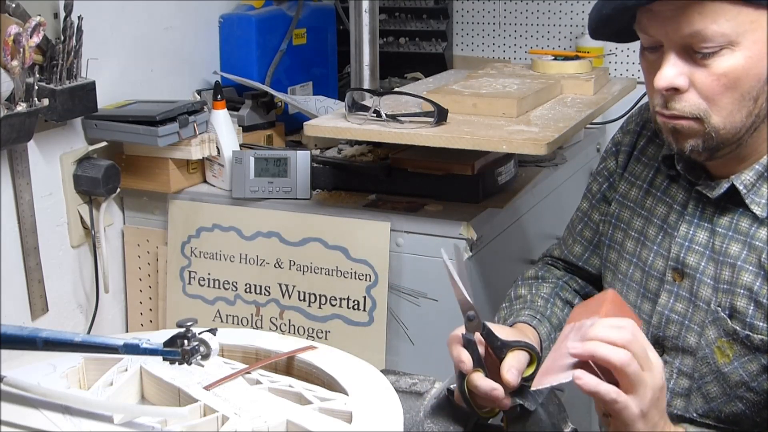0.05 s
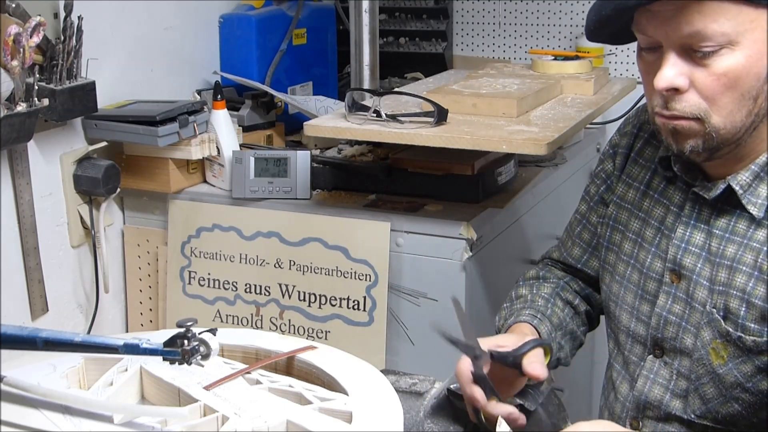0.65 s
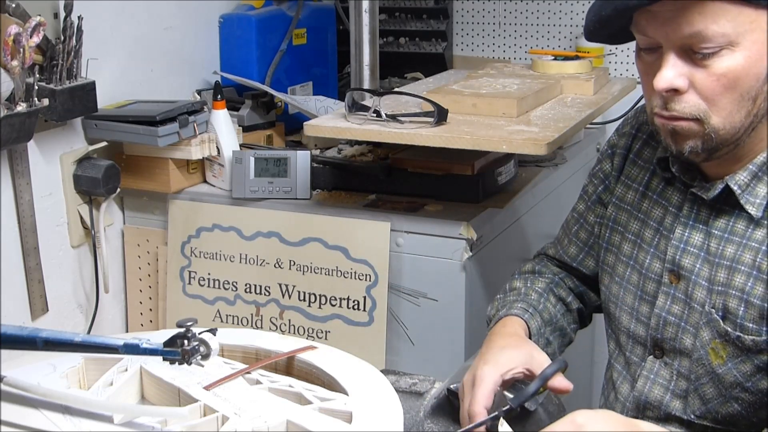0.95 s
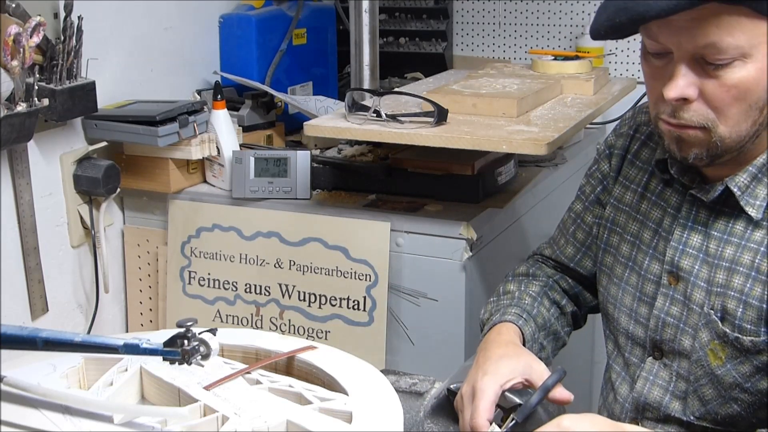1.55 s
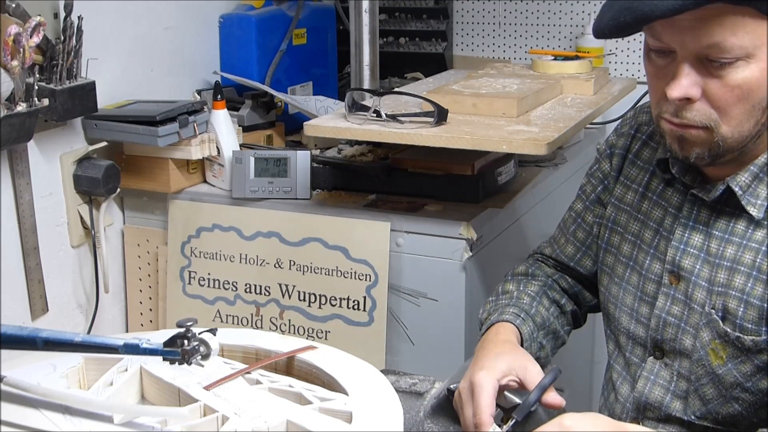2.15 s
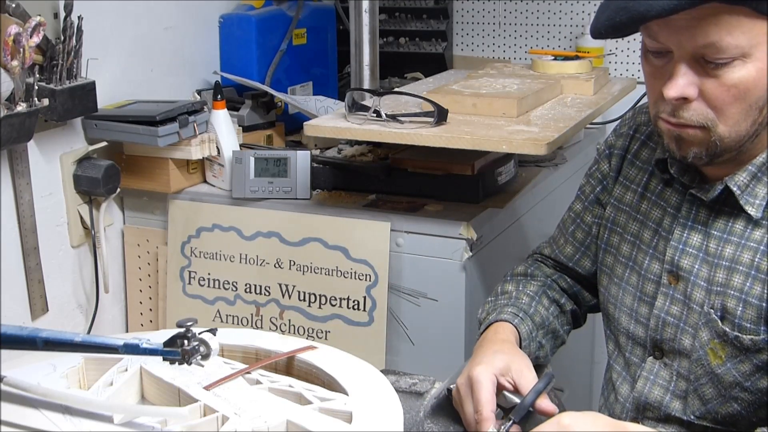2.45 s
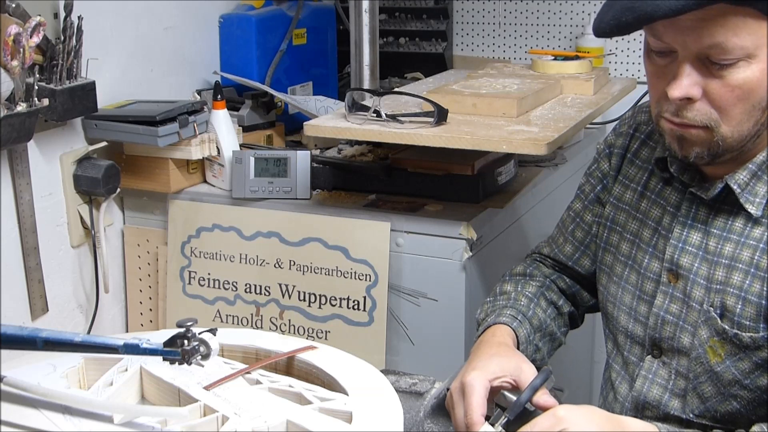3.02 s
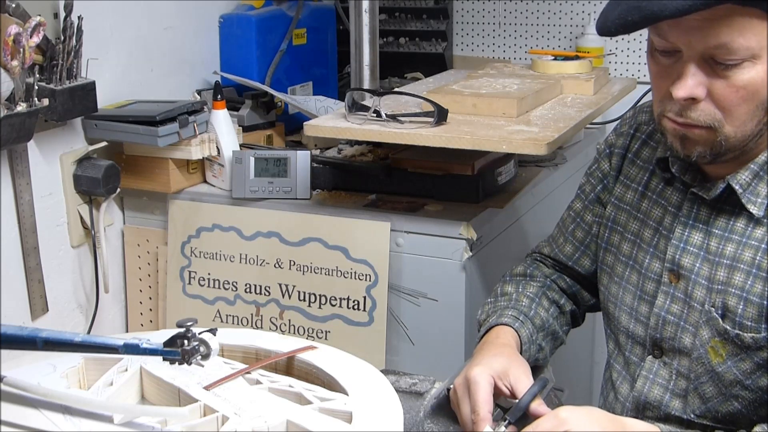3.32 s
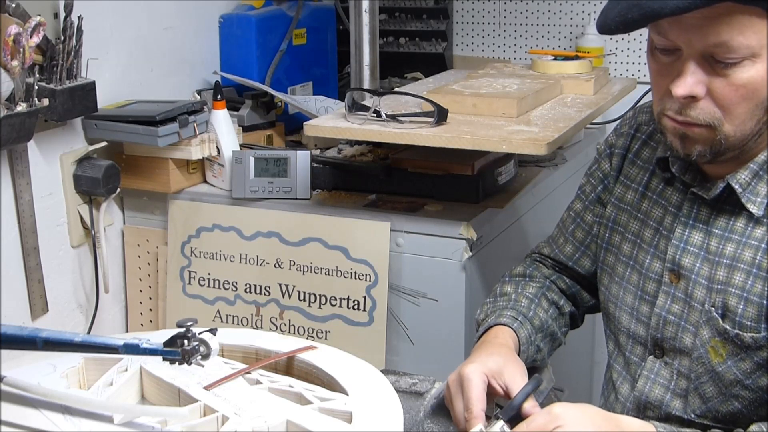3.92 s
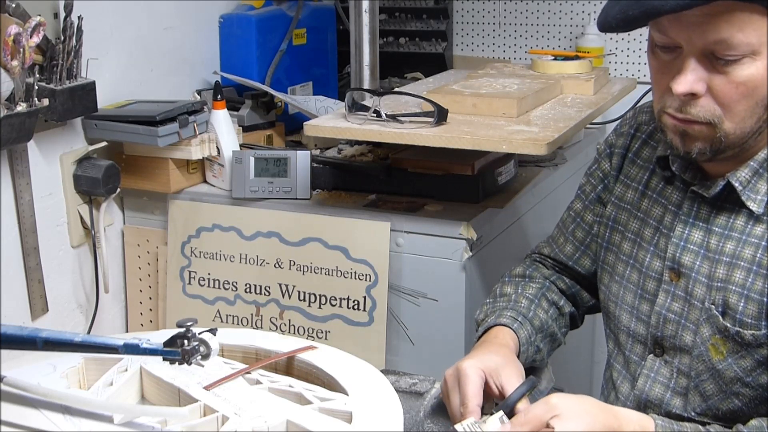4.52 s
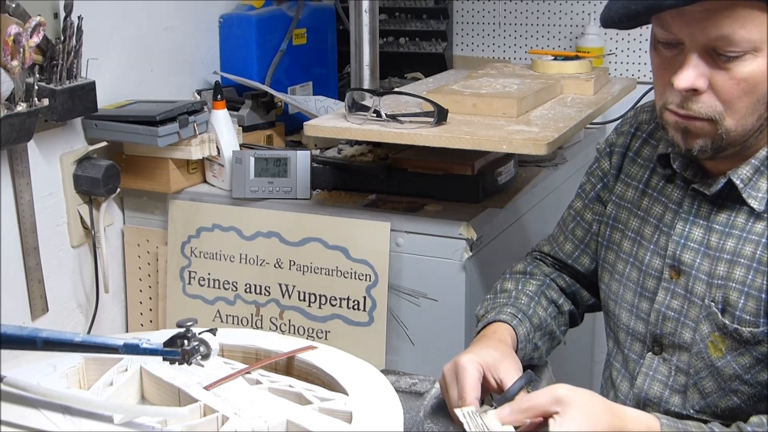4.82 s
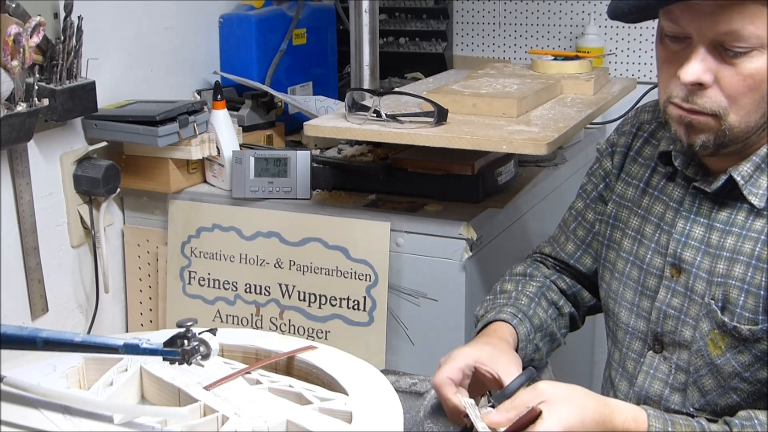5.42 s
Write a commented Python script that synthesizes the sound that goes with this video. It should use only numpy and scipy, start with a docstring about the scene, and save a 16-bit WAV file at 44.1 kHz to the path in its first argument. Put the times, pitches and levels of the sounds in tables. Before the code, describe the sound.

Sandpaper rasps and snaps as it is handled, then scissors cut it in gritty, ticking strokes over a faint hiss.

```python
"""Scissors cut a strip of sandpaper at a workbench in a small, cluttered workshop.
The blades crunch through thousands of tiny grains, sticking and slipping with sharp ticks.
The sheet rasps when rubbed, a loose flap hums, and the stiff backing snaps as it bends.
A hand and a sanding block nudge the bench. Much of the sound arrives as short room echoes,
over a steady hiss and a faint hum."""
import sys
import numpy as np
from scipy import signal
from scipy.fft import rfft, irfft, next_fast_len
from scipy.io import wavfile
from scipy.ndimage import uniform_filter1d

SR = 44100
rng = np.random.default_rng(int(sys.argv[2]) if len(sys.argv) > 2 else 0)


def to_wav(sig):
    """Store sig (one row per channel, or 1-D mono) as 16-bit WAV at the path in sys.argv[1].

    Samples outside -1..1 are clipped; the rate is SR.
    """
    pcm = np.clip(np.atleast_2d(sig), -1, 1) * 32767
    pcm = np.round(pcm).astype(np.int16)
    wavfile.write(sys.argv[1], SR, pcm.T)  # frames by channels


N = 245839
TIME = np.arange(N) / SR
FFT_SIZE = next_fast_len(N + SR // 2, real=True)
HZ = np.maximum(np.arange(FFT_SIZE // 2 + 1) * SR / FFT_SIZE, 1)

# Tone of the hiss from still air and the microphone: frequency_hz, gain_db
HISS_TONE = [(20, 1), (45, -5), (100, -7.5), (200, -3), (350, -5.5), (480, -6.5), (700, -6), (1000, -6.5),
             (1600, -11), (3200, -15), (5000, -13.5), (8500, -15), (12000, -16.5), (15500, -24)]
# How much the hiss differs between the ears: frequency_hz, side_db
HISS_STEREO = [(30, -13), (120, -9), (300, 2), (600, 8), (1200, -0.5), (3000, -2.5), (6000, -5.5),
               (9000, -13), (15000, -18)]
# Faint hum of the room: pitch_hz, width_hz, level_db
ROOM_HUM = [(140, 5.2, -82), (170, 9.9, -87.5), (643, 45, -82)]
# A hand or blade rubs the sheet: start_s, peak_s, end_s, level_db, low_db, high_db
RUBS = [(0, 0.006, 0.074, -46, 9.5, -4), (0.11, 0.192, 0.21, -61, 8, 2),
        (0.207, 0.259, 0.26, -49.5, 12, -1.5), (0.687, 0.813, 0.84, -55.5, 6, 1),
        (0.854, 0.886, 0.92, -46, 4, -6.5), (0.948, 1.05, 1.07, -56.5, -5, -3),
        (1.499, 1.529, 1.541, -41.5, 1.5, -7.5), (1.793, 1.833, 1.93, -63.5, 10, -2),
        (3.792, 3.805, 3.816, -25.5, -11, -8), (3.81, 3.818, 3.85, -40, 3.5, 0),
        (3.947, 3.944, 4.13, -62, -5, 11), (4.503, 4.511, 4.57, -57.5, -8, 7),
        (4.686, 5.0, 5.33, -58, 2.5, -4.5), (4.836, 4.865, 4.86, -46, 5, -5),
        (4.914, 4.915, 4.975, -50, -3, 2), (5.238, 5.24, 5.3, -46, 5, -15),
        (5.329, 5.359, 5.385, -40.5, 6, -6), (5.48, 5.533, 5.56, -47.5, 0.5, 1.5)]
# Tone of grit breaking on the paper backing: frequency_hz, gain_db
PAPER_TONE = [(150, -20.5), (400, -22.5), (560, -10.5), (770, -14), (980, -5.5), (1500, -5.5), (2000, -3.5),
              (3100, -6.5), (4300, -9.5), (4900, 0), (7500, 2), (10000, -2.5), (12200, -7), (16000, -25)]
# Pitches at which the sheet and blades ring: pitch_hz, width_hz, gain_db
SHEET_RESONANCES = [(840, 100, 5), (1433, 29, 8.5), (2323, 340, 9), (2600, 84, 3.5), (3973, 600, 8.5),
                    (4640, 210, 5), (4900, 74, -1), (8760, 470, 1.5)]
# The hand and block nudge the bench: start_s, level_db, pitch_hz
NUDGES = [(0.028, -53, 575), (0.034, -60, 182), (1.113, -62, 420), (4.745, -68, 298), (5.118, -67, 260),
          (5.278, -60, 308), (5.358, -67, 160)]
# The sheet buckles or the blades snap through:
# start_s, level_db, length_s, list of resonances (pitch_hz, width_hz, gain_db)
SNAPS = [(0.0285, -33.5, 0.0064, [(557, 144, -2), (1470, 730, 1.5), (2760, 300, -3.5), (3670, 1050, -2),
         (6460, 980, -7), (9300, 580, -3)]), (1.1117, -29, 0.0029, [(913, 300, 6), (1470, 550, 6),
         (2510, 540, 0.5), (3900, 1500, 1.5), (4840, 1000, 4.5), (8700, 1300, -2), (10900, 2100, -4.5)]),
         (2.437, -26, 0.0021, [(3870, 1000, -11), (7600, 4800, -2), (13500, 2600, -24)]),
         (3.5595, -31.5, 0.0098, [(915, 370, -8.5), (1400, 380, -7), (2160, 320, -6), (5300, 2300, -10),
         (8150, 2500, -4.5), (11700, 700, -10)]), (4.2060, -42, 0.0082, [(1244, 124, -0.5),
         (2460, 470, -9.5), (8300, 640, -2), (12600, 800, -10)]), (4.7408, -34, 0.0094, [(867, 150, 3),
         (1350, 2700, -13), (4400, 1800, -10.5), (7200, 1800, -9), (9200, 2500, -9), (12900, 600, -12)]),
         (5.2690, -42, 0.0061, [(1120, 270, -3), (1810, 590, 3), (6000, 3100, -5)]),
         (5.5250, -31, 0.0089, [(1760, 780, -6.5), (2320, 190, 3.5), (3640, 710, -2), (4850, 770, 2),
         (9470, 740, 2), (11200, 2000, -9.5)])]
# A loose flap hums when rubbed: start_s, length_s, level_db, pitch_hz, width_hz
FLAPS = [(0.232, 0.052, -56.5, 890, 170), (0.242, 0.041, -58.5, 1360, 220), (1.502, 0.0062, -48, 2470, 200),
         (3.802, 0.0085, -36.5, 2700, 600), (4.147, 0.025, -51.5, 1250, 180),
         (4.637, 0.033, -48.5, 950, 264), (4.676, 0.0046, -45, 2620, 250), (4.922, 0.019, -54, 2000, 320),
         (5.089, 0.072, -60, 585, 190), (5.094, 0.0052, -45, 1080, 300)]
# The blade catches on coarse grit and jumps on: time_s, surge_db, crack_db
SLIPS = [(0.293, -54, -56), (0.866, -51.5, -40), (1.740, -74, -47.5), (1.835, -67, -46), (2.037, -57, -60),
         (2.135, -55, -45), (2.167, -60, -54), (2.242, -53.5, -40.5), (2.267, -52.5, -57),
         (2.395, -46.5, -49), (2.421, -50.5, -55), (2.493, -48, -58), (2.53, -47, -56), (2.555, -47.5, -50),
         (2.593, -47, -32), (2.847, -57, -42.5), (2.880, -50.5, -57), (2.942, -43, -64), (2.974, -38, -54),
         (3.028, -39.5, -47), (3.078, -42.5, -39), (3.113, -36.5, -45), (3.224, -46, -55),
         (3.312, -48.5, -32.5), (3.412, -42, -56), (3.517, -42, -46), (3.564, -58, -26), (3.988, -42, -48),
         (4.031, -43.5, -30), (4.078, -40.5, -37), (4.136, -40.5, -28), (4.160, -52, -50),
         (4.545, -46, -35.5), (4.613, -43.5, -32), (4.649, -43.5, -39), (4.675, -43, -33),
         (4.82, -53, -38.5), (4.877, -54.5, -49), (5.050, -43.5, -36), (5.138, -45, -29)]
# The blades close through the sheet: start_s, end_s, level_db, rise_db, low_db, high_db
CUTS = [(2.044, 2.38, -63.5, 6, 2, 1), (2.386, 2.564, -57, -10, 2, 5.5), (2.816, 3.133, -53.5, 3, -4, -3.5),
        (3.3, 3.53, -49.5, 8, 0.5, 3), (3.712, 3.797, -42.5, 11, -0.5, 4.5), (3.977, 4.169, -47, 4, 2.5, 3),
        (4.312, 4.411, -36.5, 7, -1, -1), (4.552, 4.675, -45, 9, 7, 3), (5.043, 5.146, -42, 2.5, 8, -1)]
# First echoes off the bench and shelves: delay_s, gain_db
NEAR_ECHOES = [(.0004, -20), (.0068, -20.5)]
# How much the room's echo differs between the ears: frequency_hz, side_db
ROOM_STEREO = [(100, -40), (300, 0), (500, -9), (750, -14), (1200, -16), (2000, -13.5), (3300, -20),
               (5500, -20), (7500, -17), (9300, -10.5), (11500, -13), (15000, -42)]

BREAK_LOOSE_S = 0.0066   # time a stuck blade takes to get moving


def from_db(db):
    """Turn decibels into a number to multiply by."""
    return 10 ** (np.asarray(db) / 20)


def unit_power(x):
    """Scale to an average power of 1."""
    return x / np.sqrt(np.mean(np.abs(x) ** 2) + 1e-20)


def gain_curve(points):
    """Join (frequency_hz, gain_db) points into a gain for every frequency."""
    hz, db = np.transpose(points)
    return from_db(np.interp(np.log(HZ), np.log(hz), db))


def resonance(pitch_hz, width_hz):
    """A ringing object responds most at its own pitch, with a gain of 1 there."""
    return 1 / (1 + 1j * (HZ ** 2 - pitch_hz ** 2) / (HZ * width_hz))


def causal_filter(gain):
    """A filter with this gain in which nothing rings before it is struck (minimum phase)."""
    cepstrum = irfft(np.log(gain + 1e-9), FFT_SIZE)
    cepstrum[1:FFT_SIZE // 2] *= 2
    cepstrum[FFT_SIZE // 2 + 1:] = 0
    return np.exp(rfft(cepstrum))


def filtered(sound, response):
    """Pass a sound through a filter given frequency by frequency."""
    return irfft(rfft(sound, FFT_SIZE) * response, FFT_SIZE)[..., :N]


def even_tone(noise, span_hz):
    """Keep the timing of a noise, but even out its tone and give it an energy of 1."""
    spectrum = rfft(noise, 2 * len(noise))
    span_bins = max(3, int(span_hz * 2 * len(noise) / SR))
    smooth_power = uniform_filter1d(np.abs(spectrum) ** 2, size=span_bins)
    flat = irfft(spectrum / np.sqrt(smooth_power + 1e-12))[:len(noise)]
    return flat / np.sqrt(np.sum(flat ** 2))


def burst(start_s, length_s):
    """A run of tiny clicks that swells and dies; a longer one carries more energy."""
    age = np.arange(SR // 8) / SR
    swell = (age / length_s) ** 0.18 * np.exp(-(age / length_s) ** 2)
    clicks = even_tone(rng.standard_normal(len(age)) * swell, span_hz=400)
    out = np.zeros(N + len(age))
    at = int(np.clip(start_s * SR, 0, N))
    out[at:at + len(age)] = clicks * np.sqrt(length_s * SR)
    return out[:N]


def room_air(hiss_db=-66):
    """Steady noise makes a wide hiss and, in narrow bands, a faint hum."""
    hiss = from_db(hiss_db) * unit_power(gain_curve(HISS_TONE))
    hum = sum(from_db(db) * unit_power(resonance(hz, width) ** 2) for hz, width, db in ROOM_HUM)
    mid = filtered(rng.standard_normal(N), np.hypot(hiss, np.abs(hum)))
    side = filtered(rng.standard_normal(N), hiss * gain_curve(HISS_STEREO))
    return np.array([mid + side, mid - side])


def pressure(times, levels_db, attack_s, release_s):
    """One touch sets in, follows its levels and lets go."""
    start, end = times[0], max(times[-1], times[0] + attack_s)
    corners = [start - attack_s / 2, start + attack_s / 2, end, end + release_s]
    force = np.interp(TIME, corners, [0, 1, 1, 0])
    touching = force > 0
    force[touching] *= from_db(np.interp(TIME[touching], times, levels_db))
    return force


def rub_force(swell_db=8.5):
    """Each rub swells and fades; the rows drive the low, middle and high bands."""
    force = np.zeros((3, N))
    for start, peak, end, db, low_db, high_db in RUBS:
        levels_db = [db - swell_db, db, db - swell_db]
        touch = pressure([start, peak, end], levels_db, attack_s=0.0082, release_s=0.0042)
        force += from_db([[low_db], [0], [high_db]]) * touch
    return force


def breaking_grit(force, grains_per_s=11000, flex_hz=1840, splinter_hz=6270):
    """Grains of very unequal size break in random clumps, louder under more force."""
    sizes = from_db(3.5 * np.minimum(rng.exponential(1, N), 4)) * rng.choice([-1, 1], N)
    breaks = rng.random(N) < grains_per_s / SR
    judder = np.interp(TIME * 200, np.arange(N), rng.standard_normal(N))   # 200 new values a second
    clicks = sizes * breaks * from_db(1.5 * unit_power(judder))
    local_level = np.sqrt(np.abs(uniform_filter1d(clicks ** 2, size=700)) + 1e-6)
    grains = unit_power(clicks / local_level)   # the hand keeps the force even
    low = 1 / (1 + (HZ / flex_hz) ** 6)   # the slack sheet flexes
    high = 1 - 1 / (1 + (HZ / splinter_hz) ** 6)   # the grit splinters
    bands = np.array([low, 1 - low - high, high])
    return filtered(force * grains, bands).sum(axis=0)


def paper_filter():
    """The sheet gives the grit its broad tone, with ringing pitches on top."""
    gain = gain_curve(PAPER_TONE)
    for hz, width, db in SHEET_RESONANCES:
        gain *= from_db(db * np.abs(resonance(hz, width)) ** 2)
    return causal_filter(unit_power(gain))


def bench_nudges(length_s=0.013, width_hz=350):
    """Soft bumps give dull knocks that die quickly."""
    return sum(from_db(db) * filtered(burst(start, length_s), unit_power(resonance(hz, width_hz) ** 2))
               for start, db, hz in NUDGES)


def snaps():
    """A sudden release rings the blades and sheet, at different pitches for each grip."""
    crackle = from_db(-15) * gain_curve(PAPER_TONE)
    out = np.zeros(N)
    for start, level_db, length, resonances in SNAPS:
        ring_power = sum((from_db(db) * np.abs(resonance(hz, width)) ** 2) ** 2
                         for hz, width, db in resonances)
        tone = unit_power(np.sqrt(ring_power + crackle ** 2))
        out += from_db(level_db) * filtered(burst(start, length), causal_filter(tone))
    return out


def flap_hums():
    """Rubbing makes a flap ring at one pitch, set by how much of the sheet is free."""
    return sum(from_db(db) * filtered(burst(start, length), unit_power(resonance(hz, width) ** 2))
               for start, length, db, hz, width in FLAPS)


def slip_surges(lead_s=0.0047, hold_s=0.0028, fall_db_per_s=688):
    """Just before each slip's crack the blade breaks loose, runs free and slows again."""
    age = TIME[:SR // 8]
    rise = np.minimum(age / BREAK_LOOSE_S, 1)
    fall = from_db(-fall_db_per_s * np.maximum(age - BREAK_LOOSE_S - hold_s, 0))
    out = np.zeros(N + len(age))
    for time_s, surge_db, _ in SLIPS:
        at = int((time_s - lead_s) * SR)
        out[at:at + len(age)] += from_db(surge_db) * rise * fall
    return out[:N]


def grain_cracks(random_per_s=12, length_s=0.0013, gain_db=-2.5, low_cut_hz=3100):
    """Coarse grains give way with thin, sharp ticks: at each slip, and at random along each cut."""
    cracks = [(time_s, crack_db) for time_s, _, crack_db in SLIPS]
    for start, end, db, rise_db, _, _ in CUTS:
        count = round(random_per_s * (end - start))
        for progress, softness in rng.random((count, 2)):
            cut_db = db + rise_db * (progress - 0.5)
            cracks.append((start + progress * (end - start), cut_db + 4 - 6 * softness))
    ticks = sum(from_db(db + gain_db) * burst(time_s, length_s) for time_s, db in cracks)
    return signal.sosfilt(signal.butter(1, low_cut_hz, "high", fs=SR, output="sos"), ticks)


def sticking(stick_s=0.016, dip_db=6):
    """Before each slip the blade is caught, so the cut gets quieter."""
    caught = sum(np.interp(TIME, [t - 2 * stick_s, t - stick_s, t, t + BREAK_LOOSE_S], [0, 1, 1, 0])
                 for t, _, _ in SLIPS)
    return from_db(-dip_db * np.minimum(caught, 1))


def blade_force():
    """The blades close, stick and surge; the rows drive the low, middle and high bands."""
    closing = np.zeros(N)
    tone_points = []
    for start, end, db, rise_db, low_db, high_db in CUTS:
        levels_db = [db - rise_db / 2, db + rise_db / 2]
        closing += pressure([start, end], levels_db, attack_s=0.017, release_s=0.0029)
        tone_points += [(start, low_db, high_db), (end, low_db, high_db)]
    times, lows_db, highs_db = np.transpose(tone_points)
    bands_db = [np.interp(TIME, times, lows_db), np.zeros(N), np.interp(TIME, times, highs_db)]
    return np.hypot(closing * sticking(), slip_surges()) * from_db(bands_db)


def echo_filter(build_s=0.00017, fade_60_db_s=0.12):
    """Countless echoes off the clutter blur into a short, fading tail."""
    age = TIME[:SR // 4]
    shape = from_db(-60 * age / fade_60_db_s) * (1 - np.exp(-age / build_s))
    echoes = rng.standard_normal(len(age)) * shape
    return rfft(even_tone(echoes, span_hz=254), FFT_SIZE)


def workshop(sound, sway_hz=6.0, tail_over_near_db=1):
    """The sound arrives directly, by two near echoes, and as a tail that differs in each ear."""
    echoes = sum(from_db(db) * np.exp(-2j * np.pi * HZ * delay) for delay, db in NEAR_ECHOES)
    near = filtered(sound, unit_power(1 + echoes))
    sway = 2 * np.pi * sway_hz * TIME   # the flexing sheet aims its sound at other surfaces
    tail = filtered(sound * np.cos(sway), echo_filter())
    tail += filtered(sound * np.sin(sway), echo_filter())
    tail_gain = from_db(tail_over_near_db)
    mid = (near + tail_gain * tail) / np.hypot(1, tail_gain)
    side = filtered(sound, from_db(-1) * echo_filter() * gain_curve(ROOM_STEREO))
    return np.array([mid + side, mid - side])


def scene():
    """Grit and cracks sound through the sheet, then cross the room with snaps, hums and knocks."""
    force = np.hypot(rub_force(), blade_force())
    crunch = breaking_grit(force) + grain_cracks()
    sheet = filtered(crunch, paper_filter()) + snaps() + flap_hums()
    return workshop(sheet + bench_nudges()) + room_air()


def record(dry):
    """Cut the treble steeply above 15900 Hz."""
    return signal.sosfilt(signal.ellip(10, 0.1, 80, 15900, fs=SR, output="sos"), dry)


dry = scene()
out = record(dry)
to_wav(out)
```